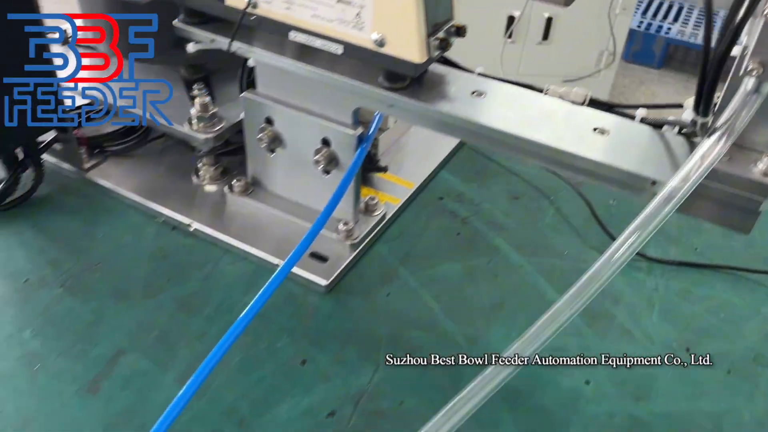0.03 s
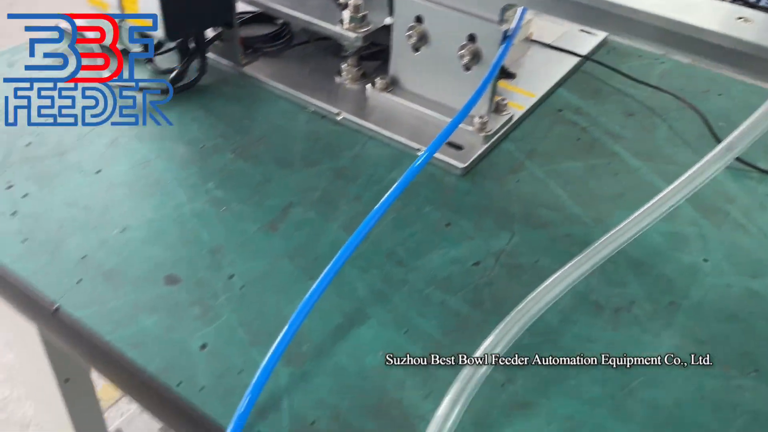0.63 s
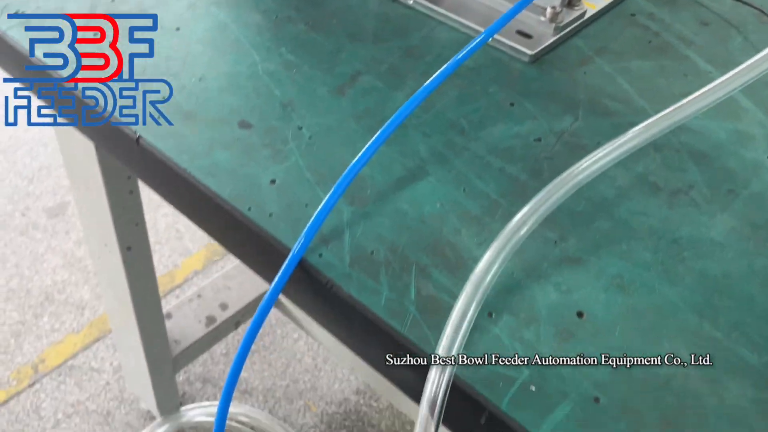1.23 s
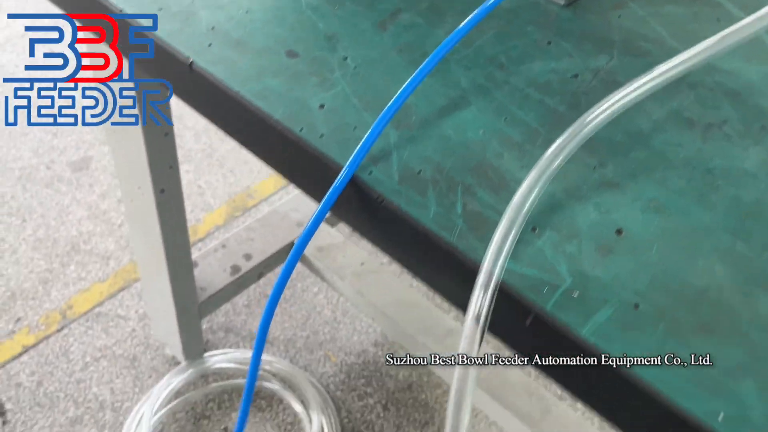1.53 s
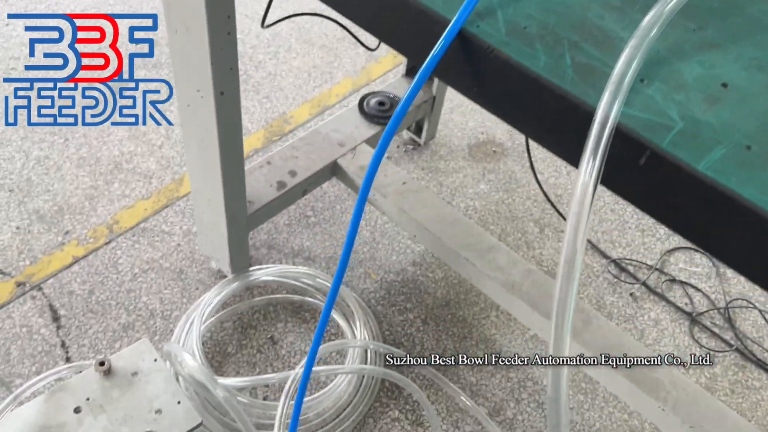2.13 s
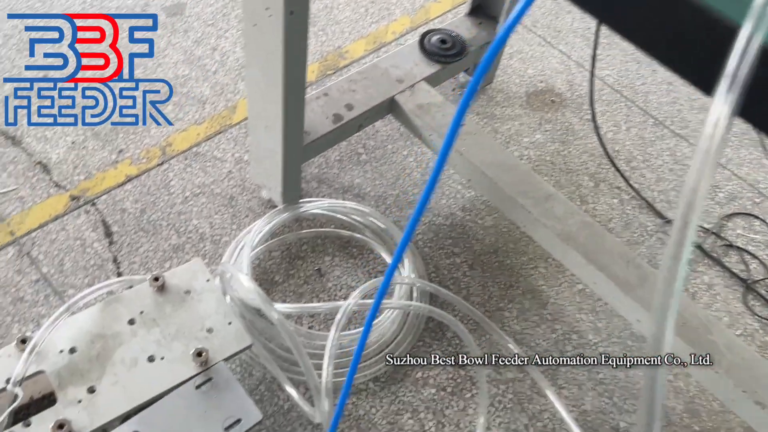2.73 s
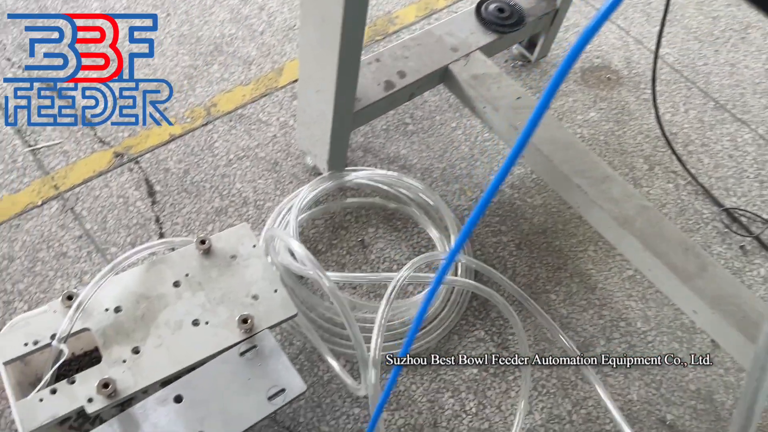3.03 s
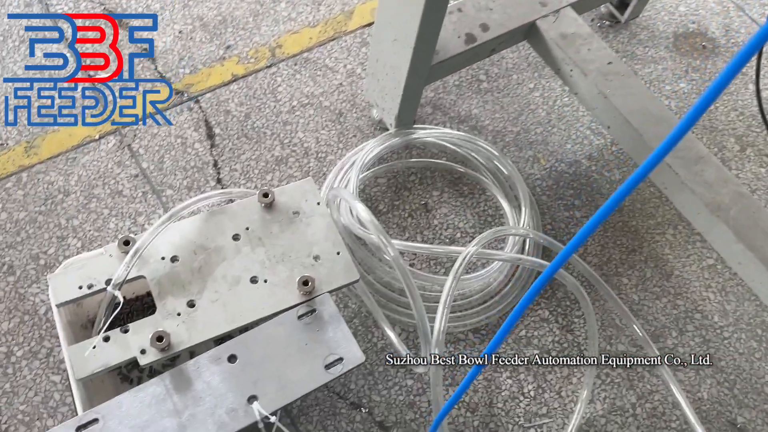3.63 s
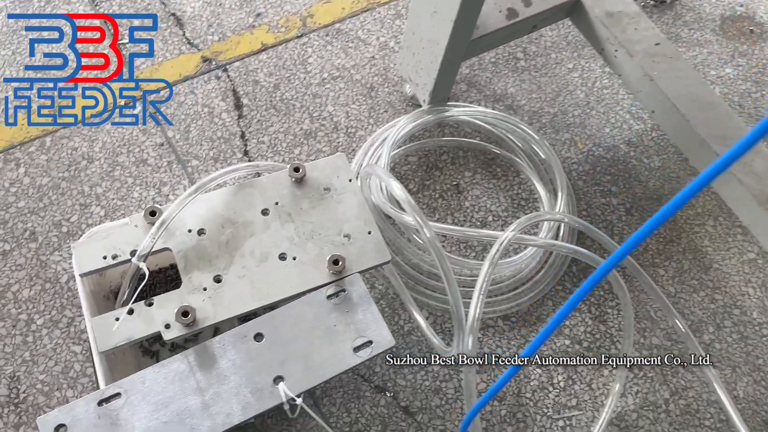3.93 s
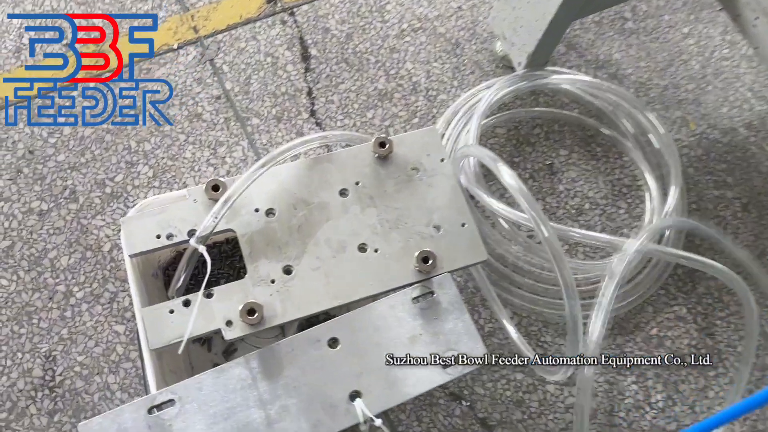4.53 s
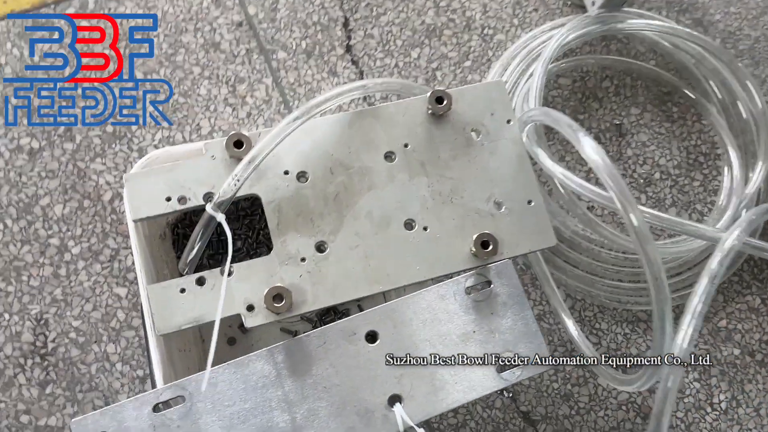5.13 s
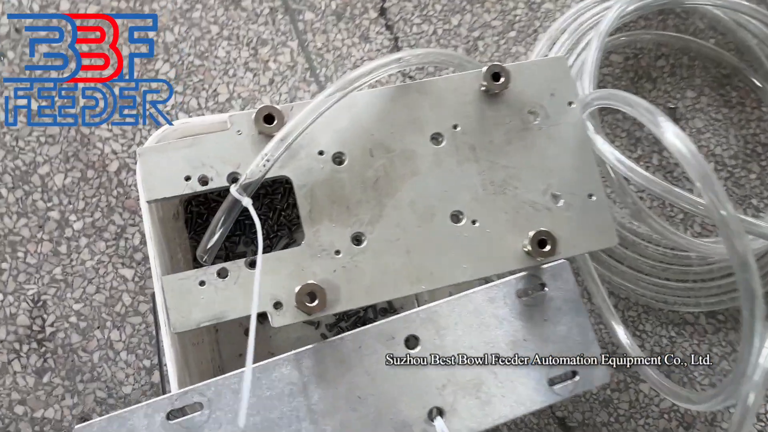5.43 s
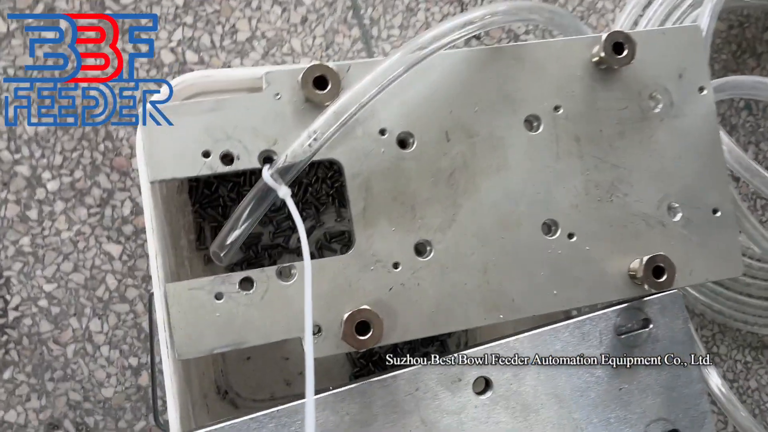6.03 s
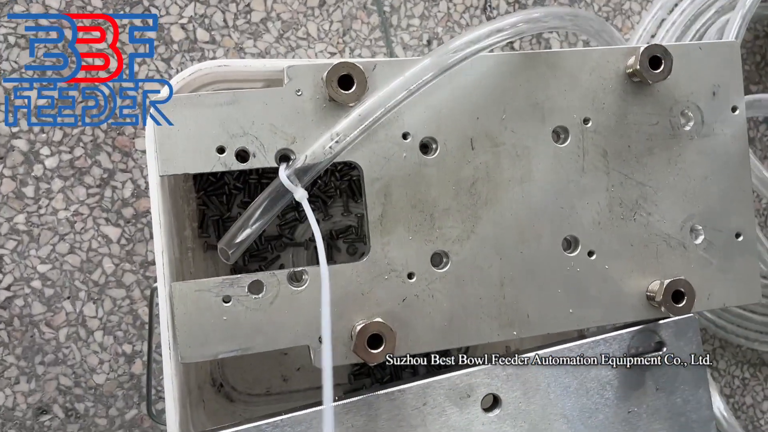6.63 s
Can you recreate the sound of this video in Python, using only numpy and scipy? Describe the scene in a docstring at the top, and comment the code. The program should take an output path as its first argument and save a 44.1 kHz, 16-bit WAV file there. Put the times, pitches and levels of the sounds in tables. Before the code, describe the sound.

A pneumatic parts feeder cycles in a workshop over a steady low hum. About every one and a half seconds a thin nozzle hiss leads into a ringing, rattling steel clunk, then air rushes hollowly through a tube and stops with a soft valve thud and tick. Other machines drone in the distance. Near the end a puff of air thumps the nearby microphone and the sound dips briefly.

```python
"""Workshop bench: an air-driven parts feeder cycles about every 1.5 s over the hum of its vibrating bowl.
Each cycle a nozzle hisses, a slide clunks home and rings the steel frame, air rushes through the hollow
modes of the feed tube, a valve thuds and a stop ticks. Far machines, far knocks and a leak lie behind.
Near the end a puff from the tube outlet thumps the microphone and the level dips briefly."""
import sys
import numpy as np
from scipy import signal
from scipy.fft import rfft, irfft, next_fast_len
from scipy.io import wavfile

SR = 44100
rng = np.random.default_rng(int(sys.argv[2]) if len(sys.argv) > 2 else 0)


def log_audio(samples):
    """Write samples as a 16-bit WAV file to the path given in sys.argv[1]."""
    # one column per channel
    frames = np.atleast_2d(samples).T
    # limit to full scale, then quantise
    limited = np.clip(frames, -1, 1)
    pcm = np.round(limited * 32767).astype(np.int16)
    wavfile.write(sys.argv[1], SR, pcm)


N = 303408
TIME = np.arange(N) / SR
PADDED = next_fast_len(N + SR)
FREQS = np.maximum(np.fft.rfftfreq(PADDED, 1 / SR), 1)


def from_db(db):
    """Decibels to gain."""
    return 10 ** (np.asarray(db) / 20)


def in_time(rows):
    """Each column of a curve at every sample."""
    time_s, *columns = np.transpose(rows)
    return [np.interp(TIME, time_s, column) for column in columns]


def at_hz(points, hz=FREQS):
    """Table lookup on a log-frequency axis."""
    freq_hz, value = np.transpose(points)
    return np.interp(np.log(hz), np.log(freq_hz), value)


def swell(centre_s, half_width_s):
    """Gaussian bump, height 1."""
    return np.exp(-((TIME - centre_s) / half_width_s) ** 2)


def gate(start_s, stop_s, rise_s, decay_s):
    """Linear rise, hold, exponential decay."""
    return np.clip((TIME - start_s) / rise_s, 0, 1) * np.exp(-np.clip((TIME - stop_s) / decay_s, 0, 20))


def coloured(spectrum):
    """Two independent noises with the given density in dB per Hz."""
    white = rfft(rng.standard_normal((2, PADDED)))
    return irfft(white * from_db(at_hz(spectrum)) * np.sqrt(SR / 2), PADDED)[:, :N]


def slow_noise(rate_hz):
    """Two independent low-passed noises, rms 1."""
    lowpass = signal.butter(2, rate_hz, fs=SR, output="sos")
    noise = signal.sosfilt(lowpass, rng.standard_normal((2, N + SR // 2)))[:, -N:]
    return noise / noise.std()


def noise_band(hz, width_hz):
    """Noise round a fixed or moving centre, rms 1."""
    phase = 2 * np.pi * np.cumsum(hz + np.zeros(N)) / SR
    return slow_noise(width_hz / 2) * np.cos(phase) + slow_noise(width_hz / 2) * np.sin(phase)


def resonance(x, hz, width_hz):
    """Two-pole resonator, peak gain 1."""
    radius = np.exp(-np.pi * width_hz / SR)
    feedback = [1, -2 * radius * np.cos(2 * np.pi * hz / SR), radius ** 2]
    return signal.lfilter(np.array([1, 0, -1]) * (1 - radius ** 2) / 2, feedback, x + 1e-18)


def contact(times_s, levels_db, spread_s, bounce):
    """Impact force: each blow scatters into micro-bounces with a flat spectrum."""
    size = 4096
    force = np.zeros((2, N + size))
    for start_s, level_db in zip(times_s, levels_db):
        lags = np.round(rng.uniform(.1, .5, (4, 2, 1)) * spread_s * SR)
        delays = np.exp(-2j * np.pi * np.fft.rfftfreq(size) * lags)
        train = irfft(np.prod((bounce - delays) / (1 - bounce * delays), axis=0))
        onset = round(start_s * SR)
        force[:, onset:onset + size] += from_db(level_db) * train * [[1], [rng.choice([-1, 1])]]
    return force[:, :N]


def knocks(events, modes, force_db, spread_s, bounce):
    """Light blows ring the modes of one small part."""
    start_s, level_db = np.transpose(events)
    force = contact(start_s, level_db + force_db, spread_s, bounce)
    return sum((-1) ** k * from_db(gain_db) * resonance(force, hz, width_hz)
               for k, (hz, width_hz, gain_db) in enumerate(modes))


def bench_echo(x, gain, first_delay_s, last_delay_s):
    """Close reflection; its path drifts unevenly as the microphone moves."""
    delay_s = np.linspace(first_delay_s, last_delay_s, N) + 3e-5 * slow_noise(4.7)[0]
    return x + gain * np.array([np.interp(TIME - delay_s, TIME, row) for row in x])


# reverberation: freq_hz, t60_s
ROOM_DECAY = [(200, 0.96), (1200, 0.77), (4000, 0.9), (12000, 0.083)]

def room(x, wet_db, build_s):
    """Diffuse tail: octave bands of noise, each dying at its own rate."""
    age_s, tail = TIME[:SR], 0
    for low_hz in 110 * 2 ** np.arange(7):
        octave = signal.butter(2, [low_hz, 2 * low_hz], "band", fs=SR, output="sos")
        band = signal.sosfilt(octave, rng.standard_normal((2, SR)))
        tail += band * from_db(-60 * age_s / at_hz(ROOM_DECAY, low_hz * np.sqrt(2)))
    tail *= (1 - np.exp(-age_s / build_s)) / np.sqrt(SR / 20)
    return from_db(wet_db) * irfft(rfft(x, PADDED) * rfft(tail, PADDED), PADDED)[:, :N]


# machine tones: pitch_hz, level_db
MACHINE_TONES = [(291, -54.5), (408, -59.5), (1227, -79), (1513, -55), (1830, -61.5), (2164, -60)]
# shop noise: freq_hz, density_db
SHOP_SPECTRUM = [(25, -104), (45, -69), (72, -63.5), (140, -75.5), (220, -73), (330, -75), (600, -75),
                 (900, -74), (1350, -76.5), (2000, -82), (3200, -78), (5500, -85), (8000, -97),
                 (15500, -101)]

def far_machines():
    """Other machines: a wash of noise and wavering tones."""
    tones = sum(from_db(level_db) * noise_band(hz, width_hz=9.7) for hz, level_db in MACHINE_TONES)
    return coloured(SHOP_SPECTRUM) * from_db(0.54 * slow_noise(13)[0]) + tones


# distant work: start_s, level_db
FAR_HITS = [(4.695, -34), (4.73, -42), (5.973, -41), (6.178, -37), (6.301, -33.5)]
# its resonances: pitch_hz, width_hz
FAR_MODES = [(900, 190), (1250, 200), (1600, 170)]

def far_knocks():
    """Knocks across the shop, blurred by distance."""
    envelope = sum(from_db(level_db) * gate(start_s, start_s, rise_s=0.0022, decay_s=0.023)
                   for start_s, level_db in FAR_HITS)
    ring = sum(noise_band(hz, width_hz) for hz, width_hz in FAR_MODES)
    return envelope * ring / np.sqrt(len(FAR_MODES))


# leak hiss: freq_hz, density_db
LEAK_SPECTRUM = [(1000, -105), (1700, -83), (3000, -85), (6000, -83.5), (8500, -91), (10500, -80.5),
                 (13500, -91), (15300, -90)]

def leak():
    """Faint air leak at the bench; fades as the microphone moves off."""
    fade_db = np.interp(TIME, [1.2, 4.3, 5.9], [0, -4.5, -11])
    return coloured(LEAK_SPECTRUM) * from_db(fade_db)


# hum envelope: time_s, level_db
HUM_LEVEL = [(0.0, -28), (5.27, -35.5), (5.38, -33.5), (6.45, -30), (6.5, -29)]
# hum partials: harmonic, gain_db
HUM_PARTIALS = [(1, 1.5), (3, -31.5), (4, -43)]

def bowl(pitch_hz=109.4):
    """An electromagnet shakes the bowl in an almost pure sine."""
    phase = 2 * np.pi * np.cumsum(pitch_hz + 0.3 * slow_noise(3.1)[0]) / SR
    shared = sum(from_db(gain_db) * np.sin(harmonic * phase) for harmonic, gain_db in HUM_PARTIALS)
    level_db = in_time(HUM_LEVEL)[0] - 0.6 + 0.82 * slow_noise(14)[0]
    apart = 0.8 * slow_noise(3)[1] * np.cos(phase)
    return np.sqrt(2) * from_db(level_db) * np.array([shared, apart])


# tiny steel part: pitch_hz, gain_db, t60_s
PING_MODES = [(9351, 0, .06), (11900, 0, .22), (12490, 11, .12)]

def ping(start_s=5.067, level_db=-45):
    """A jolted steel part rings very high."""
    age_s = np.maximum(TIME - start_s, 0)
    ring = sum(from_db(gain_db - 60 * np.minimum(age_s / t60_s, 2)) * np.sin(2 * np.pi * hz * age_s)
               for hz, gain_db, t60_s in PING_MODES)
    return from_db(level_db) * ring * [[1], [0]]


# air whistles: centre_s, half_width_s, pitch_hz, width_hz, level_db
AIR_WHISTLES = [(0.762, 0.17, 4280, 340, -35.5), (0.889, 0.027, 4100, 800, -22),
                (1.255, 0.065, 2000, 260, -42), (1.266, 0.11, 6120, 300, -44),
                (4.16, .04, 4900, 2600, -33.5), (5.334, 0.046, 4420, 2500, -29)]

def whistles():
    """Brief whistles of the air: swelling bands of turbulence."""
    return sum(from_db(level_db) * swell(centre_s, half_width_s) * noise_band(hz, width_hz)
               for centre_s, half_width_s, hz, width_hz, level_db in AIR_WHISTLES)


# jet aim as the microphone moves: time_s, sizzle_hz, sizzle_db, top_db
JET_AIM = [(0, 7100, -34.5, 5), (.28, 7200, -35.5, 5), (.55, 8100, -38.5, 4.5), (1.5, 9120, -37.5, 2.5),
           (3.3, 9420, -44, 6), (4.8, 9160, -44, -1), (6.85, 9040, -43.5, -3)]
# diffuse hiss and its beamed top: freq_hz, density_db
JET_SPECTRUM = [(200, -106), (1300, -71.5), (2200, -78.5), (3600, -81), (4600, -77.5), (5700, -76.5),
                (7000, -76), (10000, -105), (15500, -103)]
JET_TOP_SPECTRUM = [(4000, -105), (7000, -85), (10000, -74), (12000, -82.5), (14000, -78.5), (15500, -88)]
# jet resonances: pitch_hz, width_hz, level_db
JET_MODES = [(3000, 390, -56), (4520, 560, -49.5)]
# jet strength per cycle: gain_db
JET_CYCLE_DB = [1, 0.34, -1.8, -1.8, 0.44]
HANDOVER_S, RESET_S = 0.303, 0.294  # stroke to nozzle off, tube shut to nozzle on

def nozzle():
    """Small jet, open from reset to handover: hiss, beamed sizzle, fluttering resonances."""
    sizzle_hz, sizzle_db, top_db = in_time(JET_AIM)
    beam = from_db(sizzle_db) * noise_band(sizzle_hz, width_hz=1640)
    beam += from_db(top_db) * coloured(JET_TOP_SPECTRUM)
    jet = coloured(JET_SPECTRUM)
    jet += bench_echo(beam, gain=0.33, first_delay_s=0.0016, last_delay_s=0.000646)
    for hz, width_hz, level_db in JET_MODES:
        flutter_db = 3.5 * slow_noise(21)[0]
        jet += from_db(level_db + flutter_db) * noise_band(hz, width_hz)
    opens_s = [-1] + [cycle[0] + RESET_S for cycle in TUBE_CYCLES]
    flow = sum(from_db(gain_db) * gate(open_s, stroke[0] + HANDOVER_S, rise_s=0.023, decay_s=0.021)
               for open_s, stroke, gain_db in zip(opens_s, SLIDE_STROKES, JET_CYCLE_DB))
    return jet * flow * from_db(0.11 * slow_noise(27)[0])


# tube blasts: shut_s, bleed_s, flow_db, base_hz, ring_db, low_mode_db, high_mode_db, outlet_db,
# surge_s, surge_half_width_s, surge_peak_db
TUBE_CYCLES = [(1.065, 0.05, -1, 3335, -39.5, 1.5, -6, 6, .83, 0.12, 8.5),
               (2.567, 0.055, -3.5, 3208, -48, 6.5, 3.5, 2.5, 2.26, 0.1, 10),
               (4.169, 0.088, -4.5, 2963, -37.5, -10, -2, 3.5, 4.13, .14, 8.5),
               (5.777, 0.075, -3, 3050, -37, -22, -10, -3.5, 5.31, 0.068, 6)]
# tube rush and outlet spray: freq_hz, density_db
RUSH_SPECTRUM = [(200, -116), (500, -73.5), (850, -72.5), (1200, -71.5), (1550, -75), (1900, -70),
                 (2500, -68.5), (3300, -65), (4500, -69.5), (5700, -72.5), (7500, -86), (15500, -84)]
SPRAY_SPECTRUM = [(3000, -112), (6000, -79.5), (8500, -87), (10500, -80), (12300, -80), (13500, -79.5),
                  (15300, -83)]
# low, main and high tube modes: pitch_ratio, width_hz
HOLLOW_MODES = [(.42, 455), (1, 417), (1.24, 520)]

def feed_tube(lag_s=0.013, creep_hz_per_s=280, surge_hz_per_db=17, surge_share=0.51):
    """Air rushes through hollow modes and sprays at the outlet; each blast creeps up and surges once."""
    rush, spray = coloured(RUSH_SPECTRUM), coloured(SPRAY_SPECTRUM)
    flow, main_hz, hollow_db, low_db, high_db, spray_db = np.zeros((6, N))
    for stroke, cycle in zip(SLIDE_STROKES, TUBE_CYCLES):
        shut_s, bleed_s, flow_db, base_hz, ring_db, low_mode_db, high_mode_db, outlet_db = cycle[:8]
        surge_s, surge_half_width_s, surge_peak_db = cycle[8:]
        start_s, stop_s = stroke[0] + HANDOVER_S + lag_s, shut_s + lag_s
        cut_db = 3.5 * np.clip((TIME - stop_s) / 0.012, 0, 1)  # quick drop as the valve shuts
        flow += from_db(flow_db - cut_db) * gate(start_s, stop_s, rise_s=0.034, decay_s=bleed_s)
        begun = TIME > start_s
        surge_db = surge_peak_db * swell(surge_s, surge_half_width_s)[begun]
        main_hz[begun] = base_hz + creep_hz_per_s * (TIME[begun] - start_s) + surge_hz_per_db * surge_db
        hollow_db[begun] = ring_db + surge_share * surge_db
        spray_db[begun] = outlet_db + surge_db
        low_db[begun], high_db[begun] = low_mode_db, high_mode_db
    hollow = sum(from_db(hollow_db + mode_db) * noise_band(ratio * main_hz, width_hz)
                 for (ratio, width_hz), mode_db in zip(HOLLOW_MODES, (low_db, 0, high_db)))
    hollow += from_db(hollow_db - 7.5) * noise_band(main_hz, width_hz=67)  # narrow whistle
    air = from_db(-0.13) * rush + from_db(spray_db) * spray
    air = bench_echo(air, gain=0.36, first_delay_s=0.0024, last_delay_s=0.0031)
    return (hollow * from_db([[1.5], [-1]]) + air) * flow * from_db(1.2 * slow_noise(19)[0])


PUFF_S = 6.581

def puff(start_hz=212, end_hz=50.3, fall_s=0.0043, attack_s=0.0033, hold_s=0.013, release_s=0.016):
    """A gust thumps the microphone with falling pitch, then keeps buffeting it."""
    age_s = TIME - PUFF_S
    pitch_hz = end_hz + (start_hz - end_hz) * np.exp(-np.maximum(age_s, 0) / fall_s)
    turns = np.cumsum(pitch_hz) / SR
    turns -= np.interp(PUFF_S, TIME, turns)
    log_envelope = np.minimum(age_s / attack_s, 0) - np.maximum((age_s - hold_s) / release_s, 0)
    thump = from_db(-4) * np.exp(np.maximum(log_envelope, -20)) * np.cos(2 * np.pi * turns)
    buffet = from_db(-28.5) * np.clip(age_s / 0.24, 0, 1) * noise_band(54, width_hz=21)
    return thump * [[1], [0]] + buffet * [[1], [.4]]


def dip(depth_db=11, fall_s=0.048, until_s=0.16, recover_s=0.11):
    """The level dips briefly after the puff."""
    age_s = TIME - PUFF_S
    amount = np.minimum(age_s / fall_s, 1 - (age_s - until_s) / recover_s)
    return from_db(-depth_db * np.clip(amount, 0, 1))


# tick strength per cycle: level_db
STOP_CYCLE_DB = [-8, -9, -9.5, -19]
# out-of-turn chatter: start_s, level_db
STOP_CHATTER = [(3.6105, -4), (3.645, -12), (6.757, -10)]
# stop resonances: pitch_hz, width_hz, gain_db
STOP_MODES = [(520, 49, -2), (1243, 104, 12.5), (2110, 1300, -8.5)]

def stop_ticks(travel_s=0.09):
    """The slide meets its stop after the tube shuts; the stop also chatters."""
    ticks = [(cycle[0] + travel_s, level_db) for cycle, level_db in zip(TUBE_CYCLES, STOP_CYCLE_DB)]
    return knocks(ticks + STOP_CHATTER, STOP_MODES, force_db=18.5, spread_s=0.002, bounce=0.55)


# valve hits: start_s, level_db
VALVE_HITS = [(1.069, -10.5), (1.370, -10.5), (2.570, -13.5), (2.871, -14), (4.168, -18), (4.47, -18.5),
              (4.503, -17), (6.103, -11)]
# valve block: pitch_hz, width_hz, gain_db
VALVE_MODES = [(175, 71, 2), (257, 85, 3.5), (414, 74, 5.5), (715, 70, 1.5), (1360, 200, -4)]

def valve_thuds():
    """The valve knocks the low modes of its block."""
    return knocks(VALVE_HITS, VALVE_MODES, force_db=22, spread_s=0.0037, bounce=0.75)


def rattle(times_s, levels_db, taps_per_s, settle_s):
    """Force of loose parts tapping at random after each blow, dying away."""
    shake = sum(from_db(level_db) * (TIME > start_s) * np.exp(-np.abs(TIME - start_s) / settle_s)
                for start_s, level_db in zip(times_s, levels_db))
    return shake * (rng.random(N) < taps_per_s / SR) * rng.uniform(-1, 1, (2, N))


# slide landings, each raising or muting four mode groups: time_s, 4 x (centre_hz, gain_db)
SLIDE_STROKES = [(.285, 4180, 5, 298, 2, 1560, -4, 420, -2.5),
                 (1.8696, 1650, 9, 440, 3.5, 3830, 6, 315, -3), (3.388, 870, 4, 630, -9, 370, 6, 1280, 2.5),
                 (4.971, 185, 9, 6800, 3, 2700, 2.5, 420, -2.5),
                 (6.567, 1520, 1.5, 420, 2, 2630, -5, 176, 10)]
# grazes, main hits, rebounds, light knocks: start_s, level_db, bass_db, treble_db, snap_db
FRAME_HITS = [(0.2843, -2, -2.5, -1, -10), (0.294, -9.5, 1, 5.5, 1), (.305, -15, -2, 7, 2),
              (.333, -19.5, 13, 8.5, 1), (.341, -25.5, 7.5, 11, 2), (0.367, -20, 4, 9, 0),
              (.547, -18, 2, -9, -5), (.574, -23.5, 2, -6, -3), (1.859, -28, -13, 1, 2),
              (1.8702, -11, 5.5, 9, 6), (1.8793, -5, -0.5, -1, -7), (1.887, -17, 5, 8, 0),
              (1.909, -19, 0, 6, 0), (1.926, -13, 2, 0, 0), (1.936, -13, -1, -4, -5),
              (1.975, -24, 9, -1, -1), (2.034, -16, 0, -7, -6), (2.106, -21.5, 5, 1, -5),
              (2.172, -22.5, 1, -9, -3), (3.379, -23, -3, 1, 0), (3.3868, -0.5, 1, 1.5, -0.5),
              (3.397, -6, 2.5, 0, 3), (3.401, -7.5, -0.5, 2, 0), (3.411, -6, -3, -11, -9),
              (3.4498, -11, -1.5, -5, -1), (3.46, -15, -8, -7, -2), (3.475, -27, 0, -4, 2),
              (3.6103, -13.5, -2, -3, -1), (4.958, -19, 0, -5, 2), (4.9713, -3, -6.5, 0, 4.5),
              (4.983, -7, -1, -3, -5), (4.989, -13, -1, 3, 1), (5.0192, -13, 4, 1, -1),
              (5.036, -19, 7, -3, -5), (5.050, -15, 4, -2, -5), (5.077, -31, -4, -2, 0),
              (5.1825, -10.5, 0, -7, 2), (5.190, -19, 9, -2, 5), (6.554, -20.5, 10, 6, 6),
              (6.5664, -8, 0.5, 9, 6), (6.577, -2.5, 2, -4, 0.5), (6.612, 0, -6, 4, 4.5),
              (6.731, -17, 6, -4, -2), (6.756, -12.5, 0, -3, -6), (6.806, -22.5, 5, -3, -2),
              (6.8418, -16.5, -3, -3, -3)]
# steel frame: pitch_hz, width_hz, gain_db
FRAME_MODES = [(178, 70, -7), (256, 43, -2.5), (325.6, 40.5, 1.5), (415.5, 49, 1), (654, 510, -9),
               (867.3, 22, 10), (960, 118, 1.5), (1180, 110, 0.5), (1283, 39, 6.5), (1410, 220, -0.5),
               (1599, 97, 4), (2025, 15, -1.5), (1980, 420, -12), (2590, 160, -4), (2676, 44, 3),
               (2960, 600, -6), (3714, 190, -4), (4062, 81, -2), (4470, 300, -6.5), (5060, 710, -10.5),
               (6330, 640, -11.5), (9400, 3100, -18.5), (13300, 2500, -21)]

def slide_clunks(colour_octaves=0.2, colour_s=0.084, room_colour_share=0.61):
    """The slide rings the frame, coloured by where it lands. Returns direct sound and room feed."""
    start_s, level_db, bass_db, treble_db, snap_db = np.transpose(FRAME_HITS)
    loose = rattle(start_s, level_db + 17, taps_per_s=70, settle_s=0.045)
    forces = [contact(start_s, level_db + bass_db + 30.5, spread_s=0.004, bounce=0.56),
              contact(start_s, level_db + 26.5, spread_s=0.0018, bounce=0.6),
              contact(start_s, level_db + treble_db + 26.5, spread_s=0.0016, bounce=0.79),
              contact(start_s, level_db + snap_db + 26.5, spread_s=0.0012, bounce=0.85)]
    crossovers_hz = [700, 2300, 6000]
    stroke_s, *groups = np.transpose(SLIDE_STROKES)
    landings = swell(stroke_s[:, None], colour_s)
    coloured_ring = plain_ring = 0
    for k, (hz, width_hz, gain_db) in enumerate(FRAME_MODES):
        colour_db = sum(group_db * np.exp(-(np.log2(hz / centre_hz) / colour_octaves) ** 2)
                        for centre_hz, group_db in zip(groups[::2], groups[1::2]))
        force = forces[np.digitize(hz, crossovers_hz)] + loose
        mode = (-1) ** k * from_db(gain_db) * resonance(force, hz, width_hz)
        coloured_ring += mode * from_db(colour_db @ landings)
        plain_ring += mode
    direct = coloured_ring * from_db([[0.7], [-2.5]])  # more alike at both ports than the echoes
    return direct, plain_ring + room_colour_share * (coloured_ring - plain_ring)


# port similarity: freq_hz, likeness (clipped to 0..0.99)
PORT_LIKENESS = [(110, 6), (160, 1), (260, .93), (400, 0.64), (800, 0.39), (1400, 0.14), (2600, 0.4),
                 (4500, 0.18), (6500, -0.03), (8200, 4.7), (15000, 4.5)]
# channel phase: freq_hz, left_lead_rad
CHANNEL_LEAD = [(500, 0), (1400, -.4), (2100, .5), (3200, .4), (5000, .1), (6500, -.8), (7300, -1.4),
                (8000, -2.75), (8700, -3.3), (9200, -4.0), (10000, -4.8), (11200, -6.2), (12800, -6.4),
                (13900, -7.8), (14800, -9.35)]
# port balance: freq_hz, left_minus_right_db
PORT_BALANCE = [(300, 0), (600, 1), (1500, -1.5), (1950, 2.5), (4000, 2), (5400, 3.5), (7000, -0.5),
                (15000, 0.5)]

def microphones(field):
    """Shared and unshared rows mix to left and right ports; the phases of the two channels part in the treble."""
    shared, apart = rfft(field, PADDED)
    likeness = np.clip(at_hz(PORT_LIKENESS), 0, .99)
    shared *= np.sqrt((1 + likeness) / 2)
    apart *= np.sqrt((1 - likeness) / 2)
    lean = from_db(at_hz(PORT_BALANCE) / 2) * np.exp(.5j * at_hz(CHANNEL_LEAD))
    return irfft(np.array([(shared + apart) * lean, (shared - apart) / lean]), PADDED)[:, :N]


def scene():
    """Impacts, room tail, air and hum in the shop. Rows before the microphones: shared, unshared."""
    clunks, room_feed = slide_clunks()
    light_hits = valve_thuds() + stop_ticks()
    tail = room(room_feed + from_db(-6) * light_hits, wet_db=-5.5, build_s=0.0028)
    air = nozzle() + feed_tube() + leak() + whistles()
    feeder = clunks + light_hits + ping() + tail + air + bowl()
    return microphones(feeder * dip() + far_machines() + far_knocks() + puff())


def record(dry):
    """34 Hz rumble cut, soft clip, 15.75 kHz low-pass."""
    highpass = signal.butter(4, 34, "high", fs=SR, output="sos")
    lowpass = signal.ellip(10, .2, 80, 15750, fs=SR, output="sos")
    rounded = 1.134 * np.tanh(signal.sosfilt(highpass, dry) / 1.256)
    return signal.sosfilt(lowpass, rounded)


dry = scene()
out = record(dry)
log_audio(out)
```